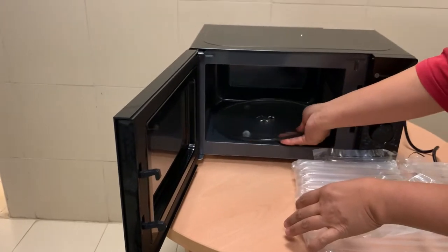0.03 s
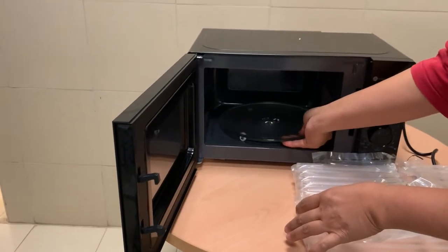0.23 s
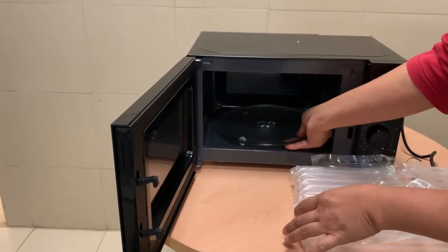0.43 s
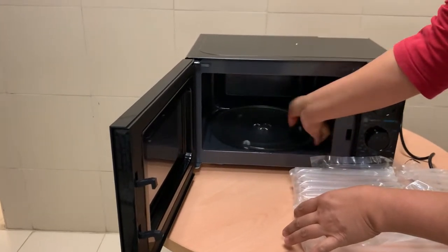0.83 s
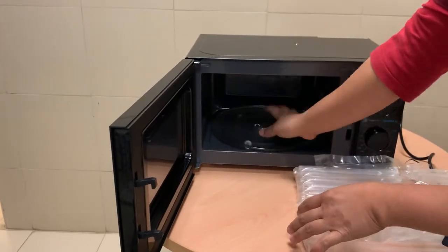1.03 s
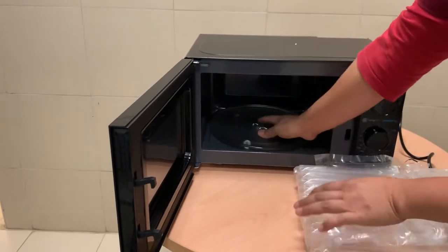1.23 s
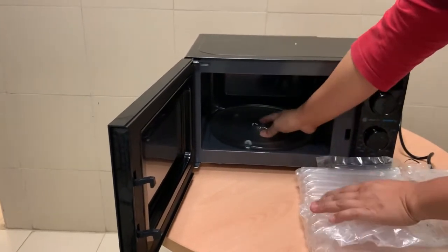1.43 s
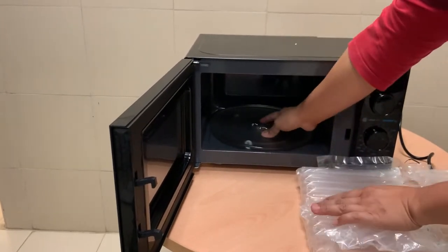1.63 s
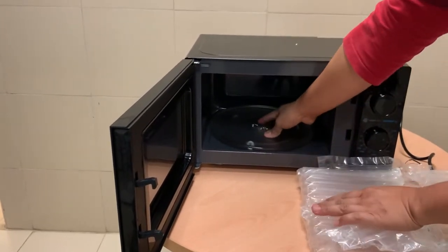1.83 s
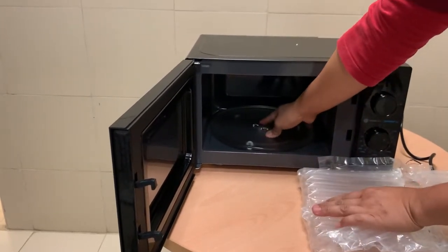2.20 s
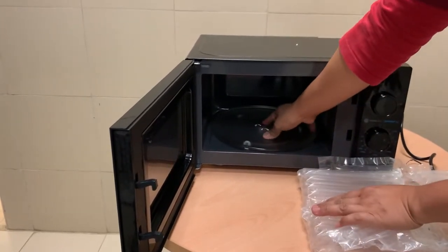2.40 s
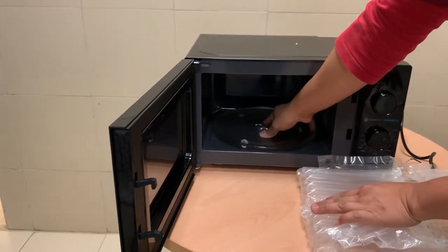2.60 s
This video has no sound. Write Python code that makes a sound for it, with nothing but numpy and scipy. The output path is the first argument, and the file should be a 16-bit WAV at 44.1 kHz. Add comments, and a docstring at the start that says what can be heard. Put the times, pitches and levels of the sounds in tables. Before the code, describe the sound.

A glass turntable knocks and rattles inside a microwave oven, with faint plastic rustling.

```python
"""A hand seats the glass turntable of an open microwave oven; the quiet tiled room rumbles and hums.
At 0.2 s the plate knocks on its rollers, and the steel cavity booms and rings with it.
From 0.6 s an inflated plastic wrap rustles under the other hand; it ticks from 1.1 to 2.2 s.
Meanwhile the plate is turned: it rattles, clinks and sings faintly as the glass rubs.
At 2.5 s it knocks on the hub and rings out."""
import sys
import numpy as np
from scipy import signal
from scipy.fft import rfft, irfft, next_fast_len
from scipy.io import wavfile

SR = 44100
rng = np.random.default_rng(int(sys.argv[2]) if len(sys.argv) > 2 else 0)


def transcribe(signal):
    """Save signal, clipped to [-1, 1], as a 16-bit WAV file at the path in sys.argv[1]."""
    frames = np.atleast_2d(signal).T
    limited = np.clip(frames, -1, 1)
    pcm = np.round(limited * 32767).astype(np.int16)
    wavfile.write(sys.argv[1], SR, pcm)


N = 121275
TAIL = int(.8 * SR)  # samples per ring-out
BANDS_HZ = 25 * 2 ** (np.arange(29) / 3)  # third-octave centres


def from_db(db):
    """Decibels to gain."""
    return 10 ** (np.asarray(db) / 20)


def unit_rms(x):
    """Scale to rms 1."""
    return x / np.sqrt(np.mean(x ** 2) + 1e-20)


def at_hz(points, hz):
    """Read a table along log frequency."""
    points_hz, values = np.transpose(points)
    return np.interp(np.log(hz), np.log(points_hz), values)


def decay(t60_s):
    """Exponential decay from 1, TAIL samples long."""
    return from_db(-60 * np.arange(TAIL) / SR / t60_s)


def drift(rate_hz):
    """Random wander, spread about 1."""
    knots = rng.standard_normal(400)
    return np.interp(np.arange(N) / SR * rate_hz, np.arange(len(knots)), knots)


def add(out, time_s, sound):
    """Mix a sound in at a time."""
    i = int(time_s * SR)
    out[:, i:i + sound.shape[-1]] += sound[..., :N - i]


def noise_bands(size):
    """Third-octave stereo noises of rms 1, as alike as the two microphone ports hear them."""
    # likeness of the ports: (frequency [Hz], correlation [0..1])
    likeness = [(60, 0.79), (170, 1), (350, 0.35), (700, 0.18), (1500, 0.72), (3000, 0.45), (5000, 0.08),
                (7000, 1), (8000, 1)]
    white, bands = rng.standard_normal((2, 2, size + 4096)), []
    for k, hz in enumerate(BANDS_HZ):
        sos = signal.butter(2, [hz / 2 ** (1 / 6), hz * 2 ** (1 / 6)], "band", fs=SR, output="sos")
        mid, side = signal.sosfilt(sos, white[k % 2])[:, -size:]
        alike = at_hz(likeness, hz)
        bands.append(unit_rms(np.sqrt(1 + alike) * mid + np.sqrt(1 - alike) * side * [[1], [-1]]))
    return bands


def turntable_knocks():
    """Each contact of the plate excites the steel panels, the cavity and the glass."""
    # contacts: (time [s], place struck, thud [dB], boom [dB], knock [dB], clack [dB], ping [dB],
    # crack [dB], cavity and glass gain [dB], rise [s])
    knocks = [(0.2026, "rim", -28.5, -18.5, -31, -18, -19, -21.5, -2, 0.0006),
              (0.207, "floor", -21.5, -16, -23.5, -31, -30, -28, 11, 0.0022),
              (0.2157, "rim", -27.5, -19, -29, -20.5, -22.5, -29.5, 7.5, 0.00015),
              (0.2402, "floor", -27.5, -9, -32, -22, -21, -53, -2, 0.0067),
              (0.3377, "floor", -23.5, -22.5, -12.5, -30, -28, -57, 2, 0.00017),
              (0.753, "floor", -42, -28, -34, -32.5, -34, -39, 3.5, 0.0031),
              (0.837, "floor", -24, -25.5, -19, -33, -32, -64, -0.5, 0.001),
              (0.843, "rim", -32, -37, -32, -38, -26, -49, 4.5, 0.0018),
              (0.857, "floor", -27, -20.5, -24.5, -23, -34, -65, -2, 0.00074),
              (0.8734, "floor", -33, -22, -25, -26.5, -30.5, -67, -12, 0.00038),
              (0.925, "floor", -42, -26, -28, -39.5, -52, -70, -4, 0.00073),
              (1.148, "floor", -23, -30.5, -49, -35, -70, -77, 7, 0.0017),
              (1.168, "floor", -43, -34.5, -26.5, -58, -59, -74, -5, 0.0018),
              (1.337, "rim", -26.5, -43, -49, -28.5, -39.5, -66, 0, 0.0031),
              (1.934, "rim", -23, -27.5, -36.5, -34, -47, -54, -0.5, 0.003),
              (1.973, "floor", -32, -29, -33, -44, -64, -78, -10, 0.0025),
              (2.197, "floor", -34, -23, -33.5, -33.5, -42, -55, 1, 0.0068),
              (2.255, "floor", -41, -27.5, -33, -44, -38.5, -56.5, -7, 0.00037),
              (2.506, "floor", -29, -22, -29, -34, -36.5, -55, 0.5, 0.00042),
              (2.5253, "hub", -21.5, -19.5, -13, -26.5, -15.5, -50, -0.5, 0.0003),
              (2.532, "floor", -33, -23.5, -18, -23.5, -28, -40, -2, 0.00068),
              (2.5372, "floor", -40, -53, -21, -41, -37, -39, -27, 0.00045)]
    # centres of the six ranges, thud to crack: (frequency [Hz])
    zones_hz = [170, 340, 720, 1200, 4000, 10000]
    out, t = np.zeros((2, N)), np.arange(TAIL) / SR
    noise = np.array(noise_bands(2 * TAIL))
    offsets = rng.integers(0, TAIL, len(knocks))
    for (time_s, place, *levels_db, ring_db, rise_s), offset in zip(knocks, offsets):
        force = list(zip(zones_hz, levels_db))
        panels = steel_panels(force, noise[..., offset:offset + TAIL])
        ring = cavity_boom(force, t) + glass_ring(force, place, t)
        attack = 1 - np.exp(-t / rise_s)
        add(out, time_s, (panels + from_db(ring_db) * ring) * attack)
    return out


def steel_panels(force, noise):
    """Dense sheet-steel modes as noise bands: a hard snap, a ring and the room's tail."""
    # panel response: (frequency [Hz], level per third octave [dB])
    response = [(90, -35), (160, -12), (300, -7.5), (550, -7.5), (800, -6.5), (1200, -6), (1800, -11),
                (2500, -12.5), (3200, -9.5), (4100, -11.5), (5200, -14), (7000, -10), (11000, -5.5),
                (15500, -13)]
    # panel decay: (frequency [Hz], T60 [s])
    panel_t60 = [(150, 0.057), (700, 0.16), (2500, 0.29), (6000, 0.2), (14000, 0.11)]
    # reverberation relative to the panels: (frequency [Hz], level [dB])
    room_share = [(150, 3), (700, -12.5), (3000, -6.5), (7000, -9.5), (14000, -11)]
    snap = from_db(-4) * decay(t60_s=0.056)
    out = np.zeros((2, TAIL))
    for hz, band in zip(BANDS_HZ, noise):
        if hz > response[0][0]:
            direct = snap + decay(at_hz(panel_t60, hz))
            reverb = from_db(at_hz(room_share, hz)) * room_tail(hz)
            out += band * from_db(at_hz(force, hz) + at_hz(response, hz)) * np.hypot(direct, reverb)
    return out


def cavity_boom(force, t):
    """The oven cavity booms in a few low modes."""
    # cavity modes: (frequency [Hz], level [dB], T60 [s])
    modes = [(220, -6.5, 0.23), (295, -5, 0.38), (340.5, -6.5, 0.38), (460.6, -12, 0.4),
             (647.5, -13.5, 0.26), (689, -14.5, 0.43), (754, -4, 0.24), (785, -15.5, 0.49)]
    return sum((-1) ** k * from_db(db + at_hz(force, hz)) * np.sin(2 * np.pi * hz * t) * decay(t60_s)
               for k, (hz, db, t60_s) in enumerate(modes))


def glass_ring(force, place, t):
    """The plate rings briefly, then lingers faintly; the place struck weights its modes."""
    # plate modes: (frequency [Hz], level [dB], place that excites it most)
    modes = [(1003, -7, "rim"), (1076, -12, "rim"), (1234, -13, "rim"), (1405, -2, "hub"),
             (1477, -10, "rim"), (1868, -9, "rim"), (1975, -12, "rim"), (2048, -10, "rim"),
             (2266, -11, "hub"), (2306, -12, "rim"), (2417, -9, "rim"), (2645, -7, "hub"),
             (3038, -8, "rim"), (3229, -7, "hub"), (3500, -9, "hub"), (3682, -13, "rim"),
             (3850, -11, "hub"), (4061, -14, "rim"), (4134, -9, "hub"), (4180, -12, "rim"),
             (4330, -14, "rim"), (4578, -11, "hub")]
    off_place_db = -17.5
    ring = np.zeros(TAIL)
    for k, (hz, db, best_place) in enumerate(modes):
        level_db = db + at_hz(force, hz) + off_place_db * (best_place != place)
        ring += (-1) ** k * from_db(level_db) * np.sin(2 * np.pi * hz * t)
    return ring * (decay(t60_s=0.12) + from_db(-11) * decay(t60_s=0.7))


def clinks():
    """Glass meets a roller or the hub: a hollow note under a short, beating pair of bright partials."""
    # clinks: (time [s], note [Hz], note level [dB], bright partial [Hz], bright level [dB])
    hits = [(0.338, 669.5, -15.5, 3310, -19.5), (0.843, 1235, -26.5, 3330, -17),
            (1.337, 565, -31.5, 2620, -35), (1.359, 1022, -31, 1543, -33), (2.256, 869, -31, 3350, -28)]
    beat_hz = 100
    out, t = np.zeros((2, N)), np.arange(TAIL) / SR
    for time_s, note_hz, note_db, bright_hz, bright_db in hits:
        note = from_db(note_db) * np.sin(2 * np.pi * note_hz * t) * decay(t60_s=0.22)
        pair = np.sin(2 * np.pi * bright_hz * t) - .5 * np.sin(2 * np.pi * (bright_hz + beat_hz) * t)
        add(out, time_s, note + from_db(bright_db) * pair * decay(t60_s=0.091))
    return out


def glass_rub():
    """While the plate is turned, the rubbing glass sings faintly in one narrow band."""
    start_s, length_s = 0.76, 1.4
    centre_hz, width_hz, level_db = 2420, 140, -59
    resonance = signal.iirpeak(centre_hz, centre_hz / width_hz, fs=SR)
    rub = unit_rms(signal.lfilter(*resonance, rng.standard_normal(N)))
    stroke = np.clip((np.arange(N) / SR - start_s) / length_s, 0, 1)
    return from_db(level_db) * rub * np.sqrt(np.abs(np.sin(np.pi * stroke)))


def wrap_ticks():
    """The taut film snaps: a very short bright tick and its trace in the room."""
    # film snaps: (time [s], level [dB])
    ticks = [(1.1201, -35.5), (1.1467, -28.5), (1.2181, -27), (1.252, -32.5), (1.2677, -34), (1.3666, -30),
             (1.4312, -29), (1.5979, -30), (1.6466, -35), (2.0295, -37.5), (2.196, -41)]
    # tick spectrum: (frequency [Hz], level per third octave [dB])
    colour = [(800, -13), (2500, -12.5), (5000, -9.5), (7500, -7), (11000, -5), (15500, -8)]
    out, tick = np.zeros((2, N)), np.zeros((2, TAIL))
    for hz, band in zip(BANDS_HZ, noise_bands(TAIL)):
        if hz > colour[0][0]:
            envelope = np.hypot(decay(t60_s=0.022), from_db(-18) * room_tail(hz))
            tick += band * from_db(at_hz(colour, hz)) * envelope
    for time_s, db in ticks:
        add(out, time_s, from_db(db) * tick)
    return out


def wrap_rustle():
    """Skin slides on the film: a hiss dotted with tiny crinkles."""
    # sliding strength: (time [s], relative level [dB])
    strength = [(0, -56.5), (.45, -57.5), (0.601, -51.5), (0.682, -43.5), (0.801, -46), (.95, -49.5),
                (1.099, -48.5), (1.269, -47.5), (1.36, -49.5), (1.479, -50.5), (1.56, -60.5), (1.66, -55),
                (1.8, -73), (2.15, -67), (2.219, -61), (2.351, -70), (2.75, -60)]
    # hiss spectrum: (frequency [Hz], level per third octave [dB])
    colour = [(600, -28), (1500, -5.5), (3000, 1.5), (4200, 1.5), (5500, -2.5), (7500, 2), (11000, -0.5),
              (15500, -8)]
    crinkles_per_s, crinkle_db, crinkle_s = 87, -20.5, 0.00033
    hiss = sum(band * from_db(at_hz(colour, hz))
               for hz, band in zip(BANDS_HZ, noise_bands(N)) if hz > colour[0][0])
    impulses = (rng.random(N) < crinkles_per_s / SR) * rng.exponential(1, N)
    crinkles = signal.lfilter([1], [1, -np.exp(-1 / (crinkle_s * SR))], impulses + 1e-18)
    level_db = np.interp(np.arange(N) / SR, *np.transpose(strength)) - 6
    return from_db(level_db) * hiss * (1 + from_db(crinkle_db) * crinkles)


def room_tail(hz):
    """Envelope of the tiled room's reverberation: a brief build-up, then decay."""
    # room decay: (frequency [Hz], T60 [s])
    room_t60 = [(150, 0.8), (700, 0.8), (4000, 0.89), (8000, 0.3), (14000, 0.4)]
    build_s = 0.0026
    return (1 - np.exp(-np.arange(TAIL) / SR / build_s)) * decay(at_hz(room_t60, hz))


def room_noise():
    """A slowly shifting rumble, faint air and a few wavering hum tones."""
    # noise floor: (frequency [Hz], level per third octave [dB])
    floor = [(25, -103), (40, -44.5), (62, -41.5), (80, -40.5), (105, -39.5), (150, -38.5), (220, -40.5),
             (320, -43.5), (500, -46), (800, -47.5), (1300, -50.5), (2500, -53.5), (4000, -59.5),
             (6300, -69), (9000, -133), (15500, -75)]
    # hum tones: (frequency [Hz], rms level [dB])
    hum = [(65, -44), (99, -38.5), (137, -43), (425, -44)]
    # swell of everything below rumble_top_hz: (time [s], gain [dB])
    rumble = [(0, 1), (.4, 1), (.85, 1.5), (1.3, -1), (2.1, 0), (2.4, 0.5), (2.6, -0.5), (2.75, -6.5)]
    rumble_top_hz, waver_db = 230, 3
    t = np.arange(N) / SR
    parts = [(hz, band * from_db(at_hz(floor, hz) + waver_db * drift(rate_hz=7.785)))
             for hz, band in zip(BANDS_HZ, noise_bands(N))]
    for hz, db in hum:
        amplitude = from_db(db) * np.sqrt(2) * (1 + 0.45 * drift(rate_hz=7))
        parts.append((hz, amplitude * np.sin(2 * np.pi * hz * t + drift(rate_hz=7))))
    swell = from_db(np.interp(t, *np.transpose(rumble)))
    return sum(part * (swell if hz < rumble_top_hz else 1) for hz, part in parts)


def scene():
    """Oven, wrap and room together."""
    return turntable_knocks() + clinks() + glass_rub() + wrap_ticks() + wrap_rustle() + room_noise()


def record(dry):
    """Two microphone ports hear each pitch apart in phase and level; peaks clip, the top is cut."""
    # phase between the ports: (frequency [Hz], left lead [rad])
    port_phase = [(0, 0), (300, 0.1), (450, 0), (750, 1.08), (1150, -1), (1850, -2.06), (2300, -1.5),
                  (2900, 2.04), (3400, 3), (4100, 6.5), (6400, 7), (8250, 2.5), (8750, 3.0), (10400, 0.57),
                  (11400, 1.6), (13000, -3.5), (13800, -3.3), (15300, -6.5)]
    # balance of the ports: (frequency [Hz], left minus right [dB])
    balance = [(30, -6), (70, -1), (150, -2.5), (300, -1), (1000, 0)]
    cutoff_hz = 16000
    size = next_fast_len(N + 4096)
    hz, sides = np.arange(size // 2 + 1) * SR / size, np.array([[1], [-1]])
    rotation = np.exp(.5j * sides * np.interp(hz, *np.transpose(port_phase)))
    gain = from_db(.5 * sides * at_hz(balance, hz + 1))
    heard = irfft(rfft(dry, size) * rotation * gain, size)[:, :N]
    lowpass = signal.ellip(10, .1, 80, cutoff_hz, fs=SR, output="sos")
    return signal.sosfilt(lowpass, np.clip(heard, -1, 1))


dry = scene()
out = record(dry)
transcribe(out)
```